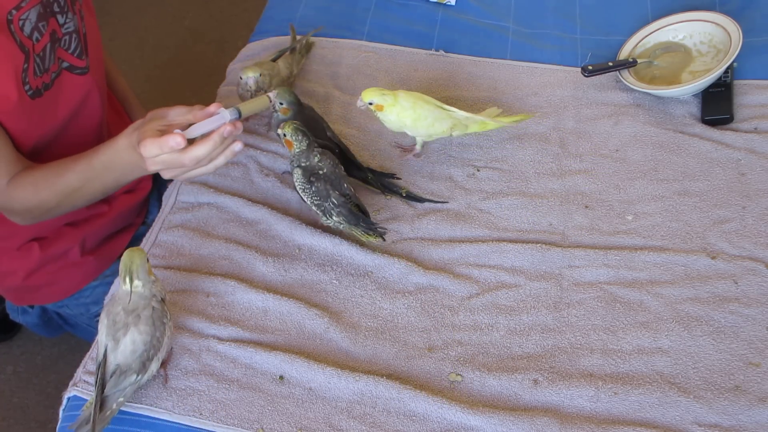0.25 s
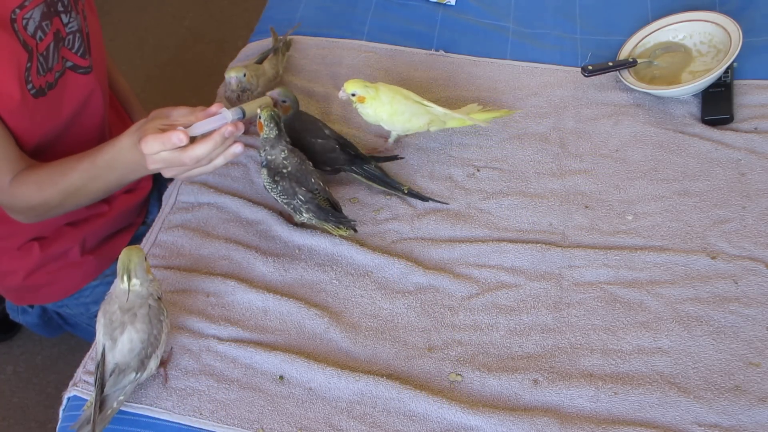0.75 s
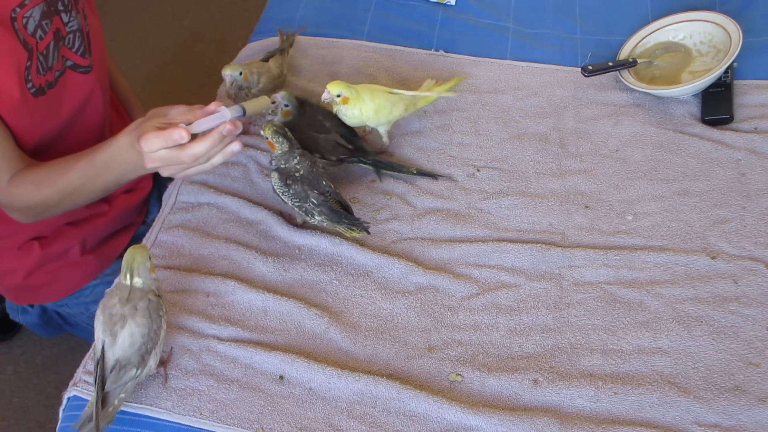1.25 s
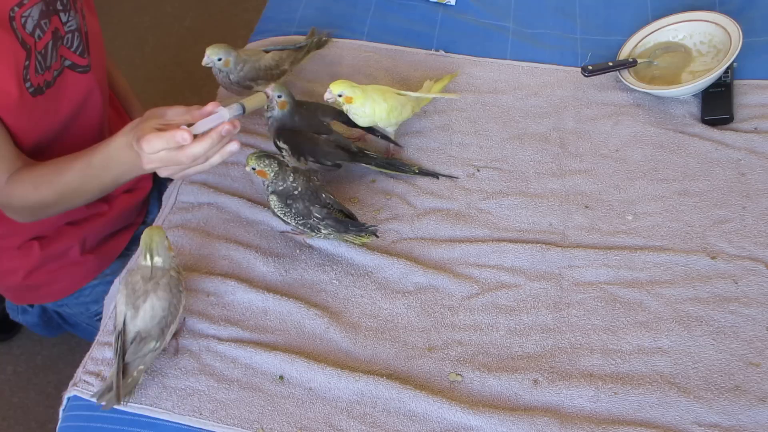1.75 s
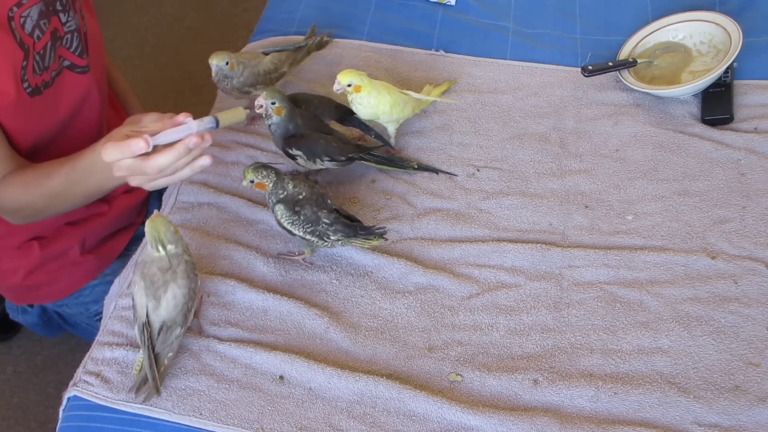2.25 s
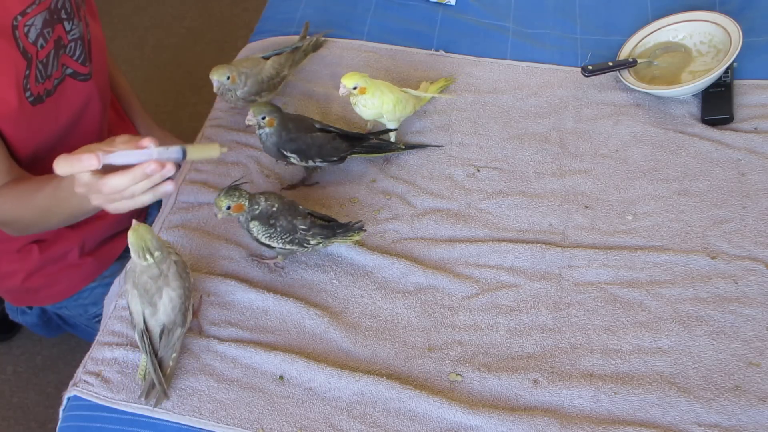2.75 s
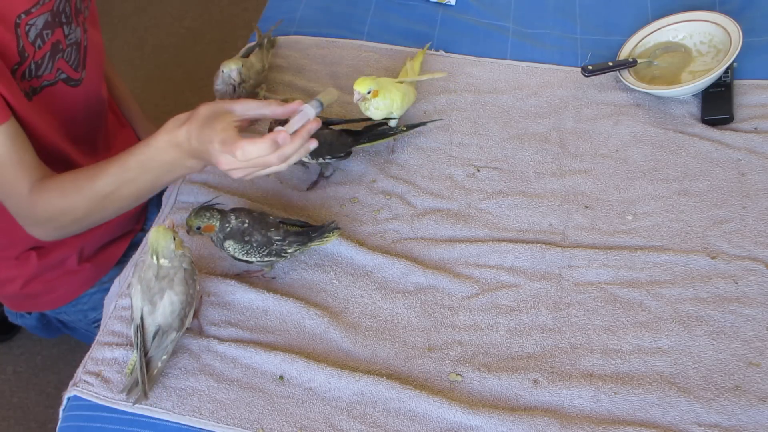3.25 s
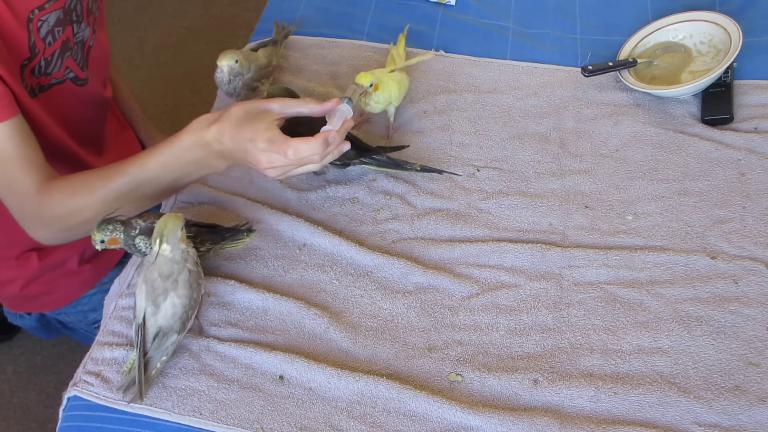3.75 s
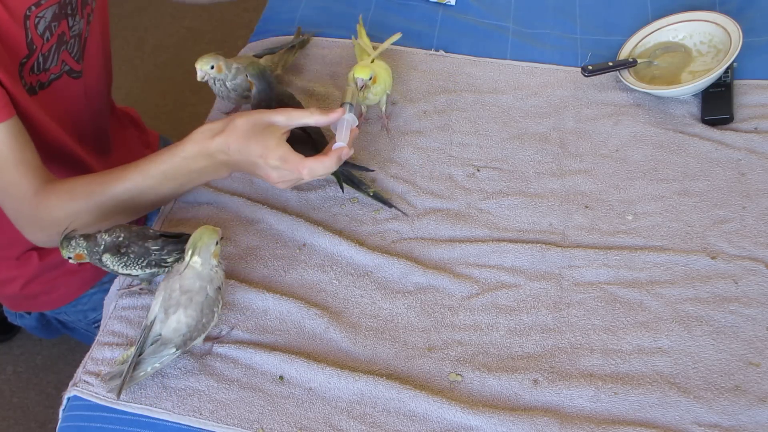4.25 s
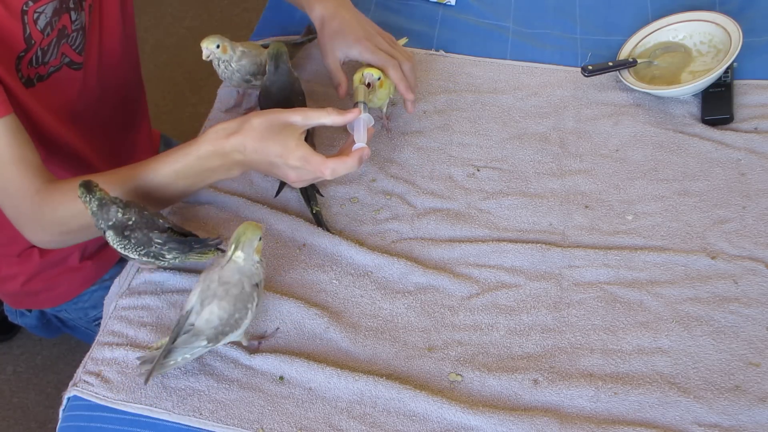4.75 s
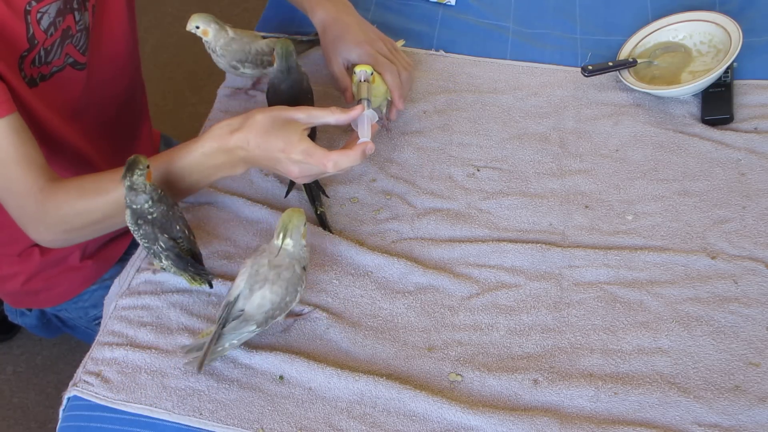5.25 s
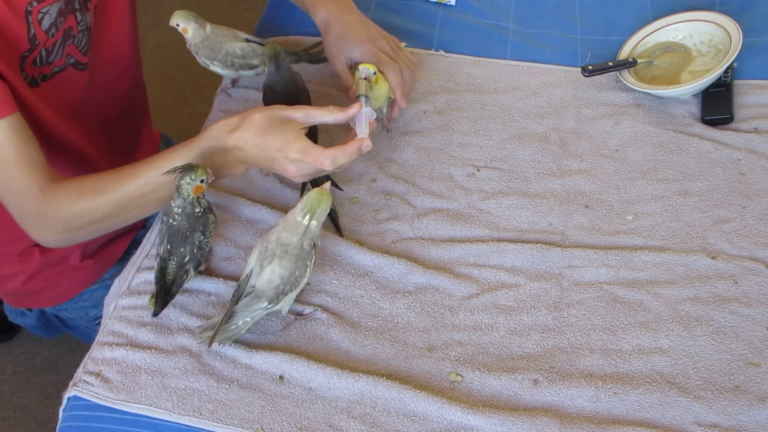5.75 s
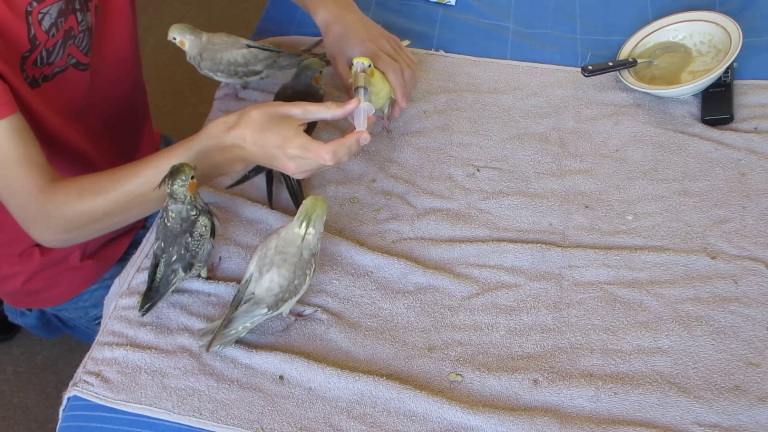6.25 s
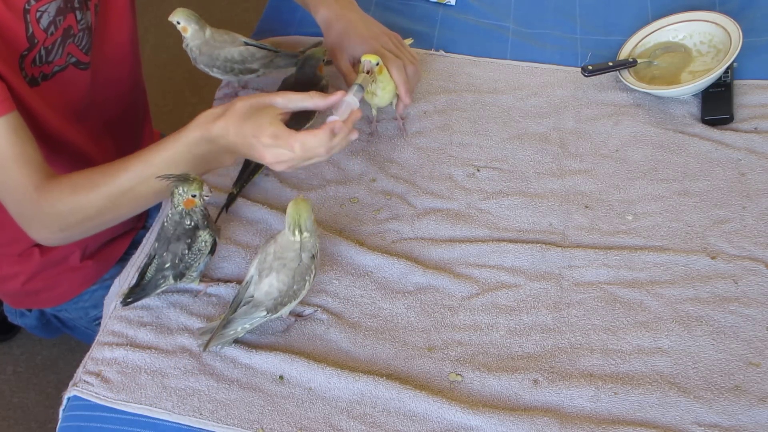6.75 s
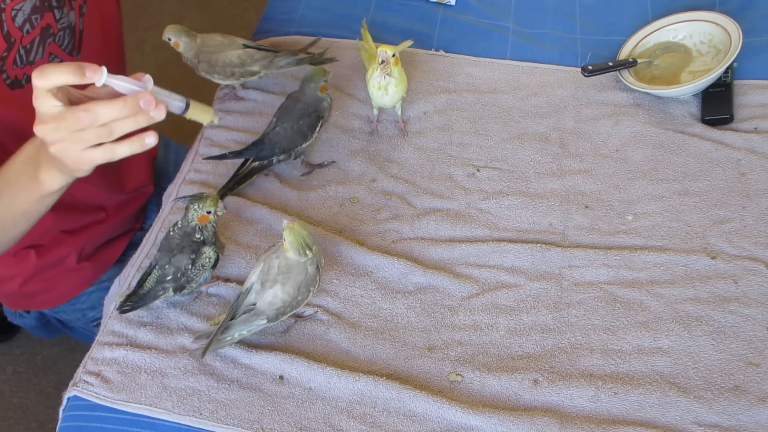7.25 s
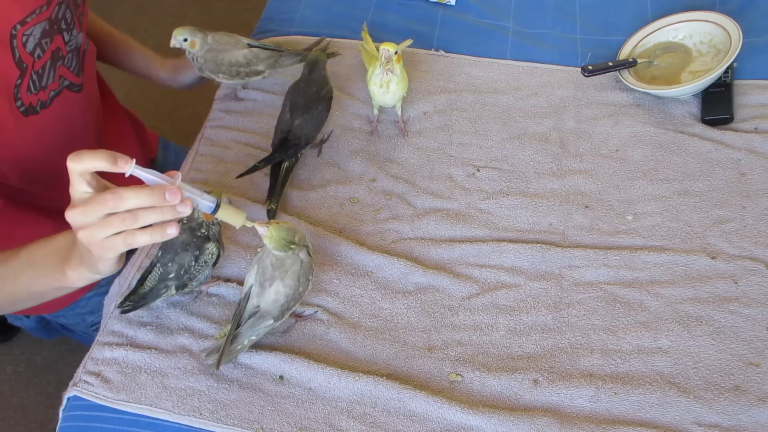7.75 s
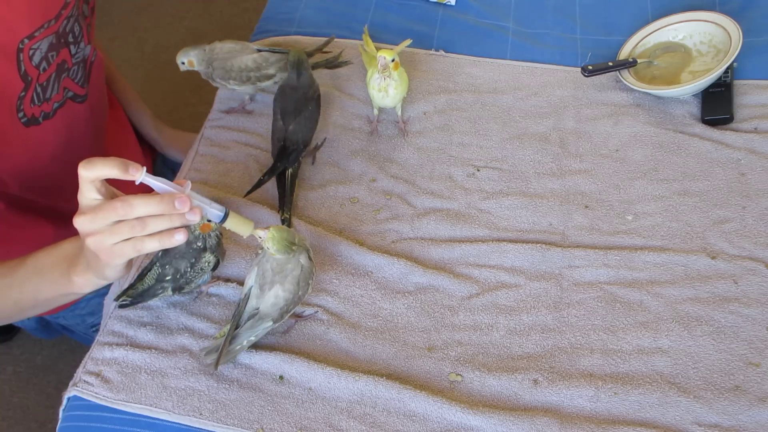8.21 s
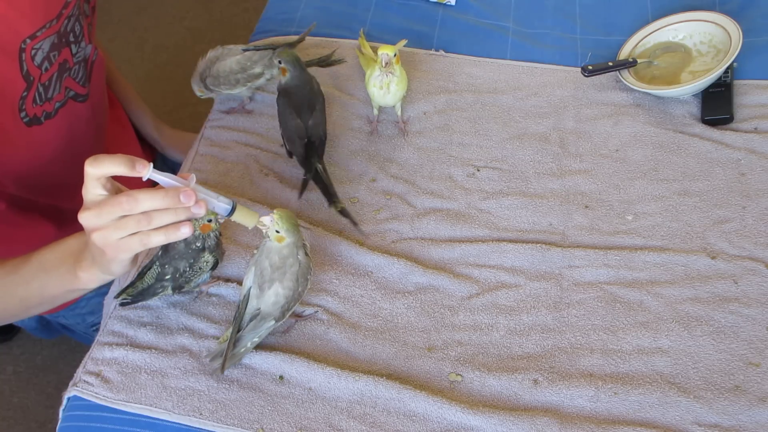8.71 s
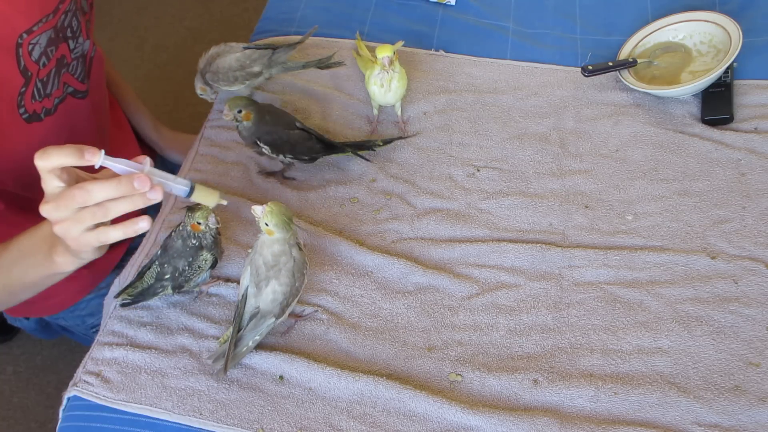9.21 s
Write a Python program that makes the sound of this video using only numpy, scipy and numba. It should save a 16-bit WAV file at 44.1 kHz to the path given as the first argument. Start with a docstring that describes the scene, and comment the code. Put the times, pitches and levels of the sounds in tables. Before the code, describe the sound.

Close indoor stereo pickup of begging young cockatiels, louder on the right, with short diffuse echoes over low room hum. One scratchy rasp leads into a rapid run of piercing gulping chirps, growing stronger until a puff of air closes it. Then come broken hoarse gasps, small peeps, dry beak ticks and soft gliding plops, a sparser moment, and finally sustained raspy hissing with a faint whistle, two late peeps and a last plop.

```python
"""Cockatiel chicks are fed from a syringe on a towel-covered table in a small room with a quiet hum.
First comes a long hoarse rasp, air noise ringing throat and beak, with a whistle rising out of it.
Then one chick gulps in a run of shrill arched chirps, harmonic tones led by squeaks, closed by a huff.
Short rasps follow among low peeps, beak ticks and soft gliding plops of food.
Long rasps end the scene, with a second whistle, two late peeps and a last plop."""
import sys
import numpy as np
from scipy import signal
from scipy.fft import rfft, irfft, next_fast_len
from scipy.io import wavfile
from numba import njit

SR = 44100
rng = np.random.default_rng(int(sys.argv[2]) if len(sys.argv) > 2 else 0)


def to_wav(s):
    """Save 16-bit WAV."""
    ch = np.atleast_2d(s).T  # columns
    pcm = np.round(np.clip(ch, -1, 1) * 32767)  # PCM
    wavfile.write(sys.argv[1], SR, pcm.astype(np.int16))


N = 418068
TIME = np.arange(N) / SR  # seconds

# Room hum common to both microphone ports. Each row: frequency in Hz, relative density in dB.
HUM_MID = [(20, -19.5), (65, -6.5), (130, -8), (500, -9), (950, -8), (1260, -1.5), (1550, -7.5),
           (1900, -17), (2500, -18.5), (3600, -28.5), (6000, -34), (11000, -36), (15500, -33.5)]
# Room hum opposed between the ports. Each row: frequency in Hz, relative density in dB.
HUM_SIDE = [(20, -17), (65, -1.5), (150, -1.5), (400, -3), (600, -6.5), (950, -11.5), (1260, -8.5),
            (1700, -18), (2500, -26), (4000, -40), (8000, -45), (15500, -39.5)]
HUM_MID_DB, HUM_SIDE_DB = -55.5, -49
# Phase by which the right port trails the left. Each row: frequency in Hz, lag in radians.
PORT_PHASE = [(800, 2.2), (1500, 1.77), (2600, 1.07), (14000, 1.24)]
# The chicks shuffle and turn their heads, so the pattern of echoes changes this often.
SHUFFLE_S = 0.25
TOP_HZ = 15600  # upper limit of the recorder

# Beak ticks. Each row: start in seconds, level at the onset in dB.
TICKS = [(2.916, -67), (3.80, -61), (3.823, -52), (5.803, -49), (5.925, -61), (6.06, -52), (6.191, -54),
         (6.325, -57)]
# Soft wet plops of food. Each row: start in seconds, peak level in dB, final pitch in Hz.
PLOPS = [(3.675, -32.5, 1580), (4.178, -33, 1536), (4.302, -38.5, 1440), (9.388, -30, 1470)]

# Huff of air that closes the main run of chirps: start in seconds, length in seconds, opening level in dB.
HUFF = (2.268, 0.033, -47)
# Hiss of the open beak in the huff. Each row: frequency in Hz, relative level in dB.
BEAK_HISS = [(1500, 2), (2800, 4), (3300, 2.5), (4100, 7), (4900, -3), (5700, 3), (6900, 1), (7900, -14),
             (9800, -23), (11700, -8), (13000, -11), (15500, -31.5)]
# Two long rasps briefly lock into a whistle near the throat resonance.
# Each row: start in seconds, length in seconds, mean pitch in Hz, level in dB.
WHISTLES = [(0.19, 0.2, 1778, -42.5), (6.85, 0.2, 1776, -47.5)]

# Peeps and low squawks. Each row: start in seconds, length in seconds, top pitch in Hz, level in dB,
# overtone level in dB before the beak colours it.
PEEPS = [(0.422, 0.017, 4190, -47, -14), (0.441, 0.017, 2760, -49, -22), (2.554, .012, 3850, -55, -5),
         (2.914, 0.012, 2130, -53, -18), (3.512, 0.021, 2165, -45, -5), (3.833, 0.023, 2130, -51.5, -11),
         (4.202, 0.024, 2082, -48.5, -9), (5.281, .028, 3155, -41, -1.5), (5.331, 0.0085, 2012, -39, -10),
         (5.409, .024, 3082, -38.5, -15.5), (5.544, .026, 3180, -38.3, -3.5),
         (5.655, 0.0087, 1990, -41.5, -12), (5.673, 0.011, 3010, -43, -1.5), (5.802, .015, 2960, -44, -1),
         (5.939, 0.0089, 2520, -49.5, -20), (6.065, 0.011, 2580, -45.5, -12), (6.393, .011, 2310, -48, -23),
         (6.621, .018, 4250, -52.5, -15), (6.634, 0.012, 2820, -50, -25), (8.158, .017, 3390, -52, -19),
         (8.275, 0.021, 2255, -41, -8)]
# Low notes are hoarse. Each row: pitch in Hz, share by which the pitch trembles.
HOARSENESS = [(2100, 0.046), (2600, 0.03), (3200, 0.019)]
# The beak favours overtones near 6 kHz. Each row: frequency in Hz, gain in dB.
OVERTONE_COLOUR = [(4200, -0.5), (6200, 0.5), (7600, -5.5), (9200, -10.5), (12000, -12), (15000, -33)]

# Shrill gulping chirps. Each row: start in seconds, length in seconds, top pitch in Hz, level in dB,
# opening squeak in dB against the chirp.
CHIRPS = [(0.533, .033, 3610, -37.5, -9), (0.646, 0.031, 3747, -37, -26), (0.78, 0.0311, 3503, -38, -34),
          (0.917, 0.036, 3370, -38.5, -14), (1.045, 0.027, 3537, -37, -3), (1.173, 0.036, 3540, -36, -10.5),
          (1.31, .038, 3560, -35, -9), (1.443, 0.027, 3313, -39.5, -3), (1.571, .048, 3564, -32, -12.5),
          (1.71, 0.041, 3524, -34, -10), (1.842, 0.04, 3507, -32, -7), (1.975, 0.045, 3569, -30.5, -8),
          (2.113, 0.047, 3570, -30.5, -13), (2.269, 0.03, 3328, -34.5, -13), (3.23, .016, 3800, -45.5, -30)]
# The 3rd harmonic is strongest mid-run and weaker before and after, down to a limit.
BRIGHTEST_S, BRIGHTEST_DB, DULLING_DB_PER_S, DULLEST_DB = 1.27, -4, 11, -15
# The 2nd harmonic against the 3rd: weak in the first chirps, full once the run is under way.
SECOND_EARLY_DB, SECOND_DB, UNDER_WAY_S = -13, 3, 0.72
HIGHEST_PARTIAL_HZ = 14700  # no partial of a chirp or peep sounds above this frequency

# Long begging rasps, one list of rows each.
# Each row: time in seconds, relative level in dB, throat resonance in Hz.
RASPS = [
    [(0, -45, 1640), (.13, -47.5, 1700), (.28, -45.3, 1710), (.39, -47, 1690), (.45, -56.5, 1760)],
    [(6.83, -55, 1750), (6.92, -50.5, 1696), (7.65, -49, 1690), (8.05, -47, 1580), (8.31, -46, 1720)],
    [(8.447, -49.5, 1550), (8.56, -53.5, 1410), (8.68, -47, 1600), (8.82, -49.5, 1340), (8.9, -49, 1570),
     (9.2, -46.5, 1607), (9.48, -46, 1660)],
]
# Short rasps. Each row: start in seconds, length in seconds before the edges are added,
# relative level in dB, throat resonance in Hz at its highest.
GASPS = [(2.392, 0.062, -58, 1450), (2.702, .076, -54, 1460), (2.972, .16, -49.5, 1400),
         (3.135, .1, -52.5, 1500), (3.276, .12, -49, 1620), (3.477, 0.064, -49.5, 1640),
         (3.632, .1, -48.5, 1580), (3.825, .035, -51, 1520), (3.982, .15, -47.5, 1555),
         (4.191, 0.034, -49.5, 1670), (4.367, 0.25, -49, 1550), (4.635, 0.14, -47, 1537),
         (4.77, .085, -49, 1330), (4.877, .11, -47.3, 1540), (5.033, .15, -46.3, 1460),
         (5.237, .11, -45, 1505), (5.63, .04, -51.5, 1550), (6.344, .055, -58, 1780),
         (6.554, 0.088, -52.5, 1830)]
# Throat resonances that move together. Each row: multiple of the throat resonance,
# width in Hz of one filter pass, relative level in dB.
THROAT = [(1, 230, 0.5), (1.02, 630, 1), (1.27, 150, -12), (.76, 333, -1), (.55, 710, -6)]
# Resonances of the open beak. Each row: frequency in Hz at mid gape, width in Hz of one filter pass,
# relative level in dB at mid gape, degree from 0 to 1 to which it follows the gape.
BEAK = [(4000, 1100, 1.5, 1), (5650, 1250, -2, 0.65), (8020, 3000, -8.5, 0.6), (10970, 4200, -9.5, 0.8),
        (13700, 1300, -35, .2)]
# A wider gape raises the throat and beak resonances together and lets out more treble.
HELD_THROAT_HZ, GASP_THROAT_HZ = 1642, 1558  # throat resonance at mid gape, long and short rasps
GAPE_POWER, WIDEST_GAPE = 1.43, 1.047  # gape (1 = mid) is this power of the throat ratio, up to a limit
TREBLE_DB, TREBLE_DB_PER_OCTAVE = -13, 7  # beak against throat at mid gape; rise as the gape doubles
TILT_DB = 10  # gain of each octave of beak resonances on the one below as the gape doubles
EDGE_S = 0.012  # attack and release of a long rasp


def undb(db):
    """Decibels are logarithmic: 20 dB is a factor of ten in amplitude."""
    return 10 ** (np.asarray(db) / 20)


def unit(x):
    """Division by the root mean square gives a signal unit effective amplitude."""
    return x / np.sqrt(np.mean(x ** 2))


def add(track, start_s, sound):
    """Linear superposition: a sound is summed into a track at its start time."""
    i = int(start_s * SR)
    track[i:i + len(sound)] += sound[:N - i]


def over_hz(points, size):
    """A spectral curve is interpolated over log frequency to the bins of a transform."""
    hz, value = np.transpose(points)
    bins_hz = np.arange(size // 2 + 1) * SR / size
    return np.interp(np.log(bins_hz + 1), np.log(hz), value)


def colour(x, points):
    """Linear filtering: the spectrum is weighted by (Hz, dB) points, then set to rms 1."""
    spectrum = rfft(x) * undb(over_hz(points, len(x)))
    return unit(irfft(spectrum, len(x)))


def wobble(rate, size):
    """Slow random modulation: normal deviates, rate per second, joined by straight lines."""
    at = np.arange(size) * rate / SR
    return np.interp(at, np.arange(size), rng.standard_normal(size))


@njit
def resonate(x, hz, width):
    """A second-order resonator with a moving centre passes its resonance at unit gain."""
    y, band, low = np.empty(len(x)), 0., 0.
    for i in range(len(x)):
        g, damping = np.tan(np.pi * hz[i] / SR), width / hz[i]
        v = (band + g * (x[i] - low)) / (1 + g * (g + damping))
        band, low, y[i] = 2 * v - band, low + 2 * g * v, damping * v
    return y


def cavity(air, hz, width):
    """Two equal resonators in cascade give a resonance with steep sides."""
    once = resonate(air, hz, float(width))
    return resonate(once, hz, float(width))


def hum(right_db=1, lean=0.067):
    """Stationary noise splits into a part in phase at both ports, leaning right, and one in antiphase."""
    mid = undb(HUM_MID_DB) * colour(rng.standard_normal(N), HUM_MID)
    side = undb(HUM_SIDE_DB) * colour(rng.standard_normal(N), HUM_SIDE)
    left = (1 - lean) * mid + side
    right = (1 + lean) * mid - undb(right_db) * side
    return np.array([left, right]) * undb(0.13 * wobble(2.44, size=N))


def echoes(x, fade):
    """Diffuse reflection is convolution with fading noise; each new pattern blends into the next."""
    out, hop = np.zeros(N), int(SHUFFLE_S * SR)
    for centre in range(0, N + hop, hop):
        i = np.arange(max(centre - hop, 0), min(centre + hop, N))
        pattern = rng.standard_normal(len(fade)) * fade
        pattern = pattern / np.linalg.norm(pattern)
        blend = np.cos(np.pi / 2 * (i - centre) / hop)
        add(out, i[0] / SR, signal.fftconvolve(x[i] * blend, pattern))
    return out


def room(x, wet_db=0.5, t60=0.32, early_db=3, early_t60=0.17, right_db=7.0, apart_db=-5, apart_hz=4000):
    """Direct sound meets two exponential decays of echo; the right port is louder and lags in phase."""
    t = TIME[:SR // 3]
    fade = undb(-60 * t / t60) + undb(early_db - 60 * t / early_t60)
    fade = fade * (t > 0.002)
    shared = undb(wet_db) * echoes(x, fade)
    apart = undb(wet_db) * echoes(x, fade)
    # mainly short waves differ between ports this close
    high_pass = signal.butter(1, apart_hz, "high", fs=SR, output="sos")
    apart = undb(apart_db) * signal.sosfilt(high_pass, apart)
    size = next_fast_len(N)
    lag = np.exp(-1j * over_hz(PORT_PHASE, size))
    right = irfft(rfft(x + shared, size) * lag, size)[:N]
    return np.array([x + shared + apart, undb(right_db) * right])


def feeding(plop_s=0.0017, glide_s=0.00098, tick_s=0.0011):
    """A plop is a damped tone gliding up as a wet gap closes; a dry beak tick is decaying noise."""
    out, t = np.zeros(N), TIME[:SR // 25]
    for s, db, final_hz in PLOPS:
        hz = final_hz * (1 - 0.8 * np.exp(-t / glide_s))
        phase = 2 * np.pi * np.cumsum(hz) / SR
        swell = t / plop_s * np.exp(1 - t / plop_s)
        add(out, s, undb(db) * np.sin(phase) * swell)
    for s, db in TICKS:
        crack = colour(rng.standard_normal(len(t)), [(600, -37), (2200, -21), (7000, 2.0), (15000, 3.5)])
        add(out, s, undb(db) * crack * np.exp(-t / tick_s))
    return out


def huff(release_db=-8):
    """Turbulent flow through the open beak makes a burst of hiss that fades as the air runs out."""
    out, (s, length, db) = np.zeros(N), HUFF
    hiss = colour(rng.standard_normal(int(length * SR)), BEAK_HISS)
    add(out, s, hiss * undb(db + np.linspace(0, release_db, len(hiss))))
    return out


def whistles(waver=0.008, flutter_db=2):
    """Locked oscillation: an unsteady tone rises out of the hiss and sinks back."""
    out = np.zeros(N)
    for s, length, mean_hz, db in WHISTLES:
        size = int(length * SR)
        hz = mean_hz * (1 + waver * wobble(397, size=size))
        phase = 2 * np.pi * np.cumsum(hz) / SR
        swell = np.sqrt(np.hanning(size)) * undb(db + flutter_db * wobble(149, size=size))
        add(out, s, np.sqrt(2) * swell * np.sin(phase))
    return out


def note(length, top_hz, harmonics_db, jitter, rise, fall, crest, fray, bloom=0.047, mute_db=-9):
    """Harmonic oscillation of the syrinx: pitch arches to a crest, then drops and frays as the beak shuts."""
    u = np.linspace(0, 1, int(length * SR))
    closing = np.clip((u - crest) / (1 - crest), 0, 1)
    sag = np.where(u < crest, rise * (1 - u / crest) ** 2, fall * closing ** 2)
    tremble = (jitter + fray * closing ** 2) * wobble(1386, size=len(u))
    hz = top_hz * (1 - sag) * (1 + tremble)
    phase = 2 * np.pi * np.cumsum(hz) / SR
    swell = np.interp(u, [0, .07, .35, .56, .8, 1], [0.27, 0.43, 0.74, 0.91, .7, 0.021])
    swell = swell * undb(2.6 * wobble(306, size=len(u)))
    # overtones grow as the syrinx is driven harder, and the shutting beak mutes them first
    bright = swell ** bloom * undb(mute_db * closing ** 2)
    voice = np.zeros(len(u))
    for k, db in enumerate(harmonics_db, 1):
        if k * top_hz < HIGHEST_PARTIAL_HZ:
            voice += undb(db) * bright ** (k - 1) * np.sin(k * phase)
    return np.sqrt(2) * swell * voice


def peeps(air_db=-17):
    """Short harmonic notes open with turbulent air; the lower the pitch, the more it trembles."""
    out = np.zeros(N)
    for s, length, hz, db, overtones_db in PEEPS:
        overtones = overtones_db + np.interp(hz * np.arange(2, 7), *np.transpose(OVERTONE_COLOUR))
        jitter = np.interp(hz, *np.transpose(HOARSENESS))
        voice = note(length, hz, [0, *overtones], jitter, rise=0.049, fall=0.085, crest=0.29, fray=0)
        air = colour(rng.standard_normal(len(voice)), [(1500, 5), (3500, -9.0), (8000, -7), (15000, -11.5)])
        puff = undb(air_db) * air * np.linspace(1, 0, len(air)) ** 2
        add(out, s, undb(db) * (voice + puff))
    return out


def squeak(from_hz, to_hz, settle_s=0.0048, ring_s=0.0038):
    """Mode catching: the syrinx's other side finds a high unsteady mode before a chirp and dies under it."""
    t = TIME[:SR // 30]
    hz = to_hz + (from_hz - to_hz) * np.exp(-t / settle_s)
    hz = hz * (1 + 0.037 * wobble(2530, size=len(t)))
    swell = t / ring_s * np.exp(1 - t / ring_s)
    return np.sin(2 * np.pi * np.cumsum(hz) / SR) * swell


def chirps(fourth_db=-13, air_db=-21, full_s=0.0423, least_s=0.026):
    """Each gulp superposes a squeak, a puff of turbulent air and a harmonic chirp, varied at random."""
    out = np.zeros(N)
    for s, length, hz, db, squeak_db in CHIRPS:
        vary, squeak_pitch = 1 + np.array([.15, .03]) * rng.standard_normal(2)
        # only the longer chirps have time to climb; short ones start near the top and drop further
        arch = np.clip((length - least_s) / (full_s - least_s), .15, 1)
        third_db = max(BRIGHTEST_DB - DULLING_DB_PER_S * abs(s - BRIGHTEST_S), DULLEST_DB)
        second_db = third_db + (SECOND_DB if s > UNDER_WAY_S else SECOND_EARLY_DB)
        harmonics_db = [0, second_db, third_db, (second_db + third_db) / 2 + fourth_db]
        rise, fall = 0.084 * arch * vary, (.19 - .07 * arch) * vary
        voice = note(length, hz, harmonics_db, 0.011, rise, fall, crest=0.25 + 0.22 * arch, fray=0.064)
        add(out, s, undb(db) * voice)
        puff = rng.standard_normal(int(0.024 * SR))
        air = colour(puff, [(1500, 3.0), (4500, 5), (7000, -10), (15000, -18)])
        add(out, s - .004, undb(db + air_db) * air * np.hanning(len(air)))
        opening = squeak(from_hz=5150 * squeak_pitch, to_hz=4600 * squeak_pitch)
        add(out, s - .006, undb(db + squeak_db) * opening)
    return out


def rasp(s, db, throat_hz, mid_throat_hz, edge_s, flutter_db=2.0):
    """Source and filter: air torn into spurts by the slack syrinx rings the throat and the open beak."""
    t = np.arange(s[0], s[-1], 1 / SR)
    size = len(t)
    db, throat_hz = np.interp(t, s, db), np.interp(t, s, throat_hz)
    gape = np.minimum((throat_hz / mid_throat_hz) ** GAPE_POWER, WIDEST_GAPE)
    treble_db = TREBLE_DB + TREBLE_DB_PER_OCTAVE * np.log2(gape)
    spurts = undb(flutter_db * wobble(450, size=size) + 0.29 * wobble(49.5, size=size))
    air, hiss = spurts * rng.standard_normal((2, size))
    # the resonances waver slightly
    throat_hz = throat_hz * (1 + 0.013 * wobble(43.3, size=size))
    gape = gape * (1 + 0.031 * wobble(20.23, size=size))
    throat, beak = np.zeros(size), np.zeros(size)
    for multiple, width, mode_db in THROAT:
        throat += undb(mode_db) * cavity(air, multiple * throat_hz, width)
    tilt_db = TILT_DB * np.log2(gape)
    for hz, width, mode_db, follow in BEAK:
        octaves_up = np.log2(hz / BEAK[0][0])
        beak += undb(mode_db + tilt_db * octaves_up) * cavity(hiss, hz * gape ** follow, width)
    edges = np.clip(np.minimum(t - t[0], t[-1] - t) / edge_s, 0, 1)
    return edges * undb(db) * (unit(throat) + undb(treble_db) * unit(beak))


def begging(long_db=0.2, short_db=0, start_db=-5, end_db=-7, shut=0.11, ease_s=0.016):
    """Gape sets resonance: long rasps follow a contour, in short ones the beak opens and shuts once."""
    out = np.zeros(N)
    for rows in RASPS:
        add(out, rows[0][0], undb(long_db) * rasp(*np.transpose(rows), HELD_THROAT_HZ, edge_s=EDGE_S))
    sag = 1 - shut * np.array([0.31, 0, 0.43, 0.98])  # a closing beak lowers and dulls the resonances
    for s, length, db, throat_hz in GASPS:
        times = s + length * np.array([0, .3, .7, 1]) + ease_s * np.array([-1, 0, 0, 1])
        swell_db = db + short_db + np.array([start_db, 0, 0, end_db])
        add(out, times[0], rasp(times, swell_db, throat_hz * sag, GASP_THROAT_HZ, edge_s=2 * ease_s))
    return out


def scene():
    """Superposition: all the chicks share one table and one room, and the hum is added to them."""
    dry_sounds = chirps() + huff() + peeps() + begging() + whistles() + feeding()
    return room(dry_sounds) + hum()


def record(dry):
    """Band limitation: the recorder's steep low-pass cuts the top."""
    return signal.sosfilt(signal.ellip(10, .2, 70, TOP_HZ, fs=SR, output="sos"), dry)


dry = scene()
out = record(dry)
to_wav(out)
```